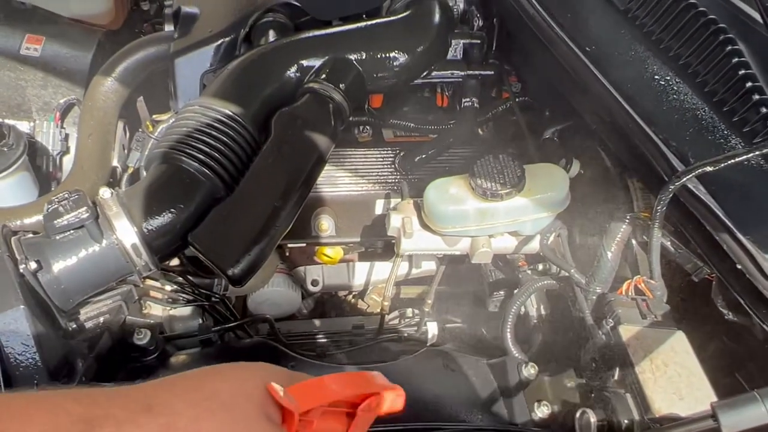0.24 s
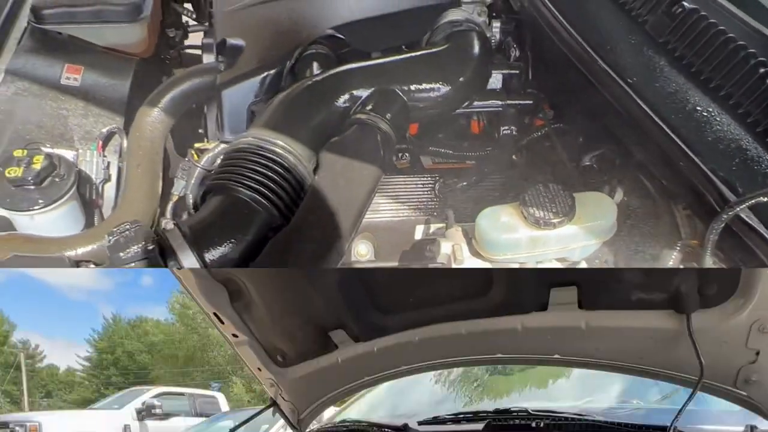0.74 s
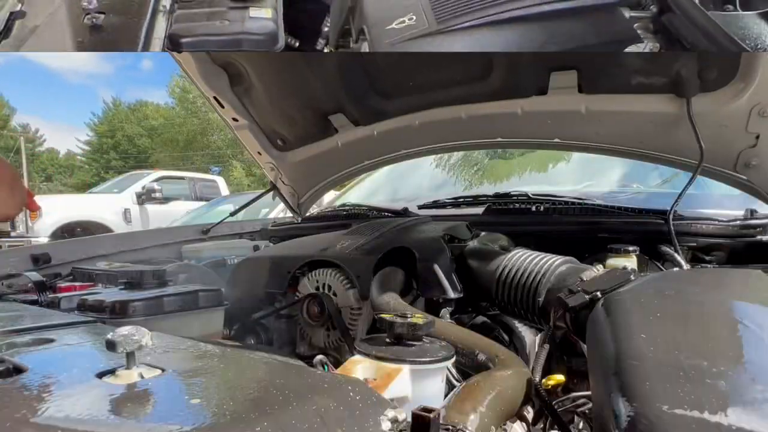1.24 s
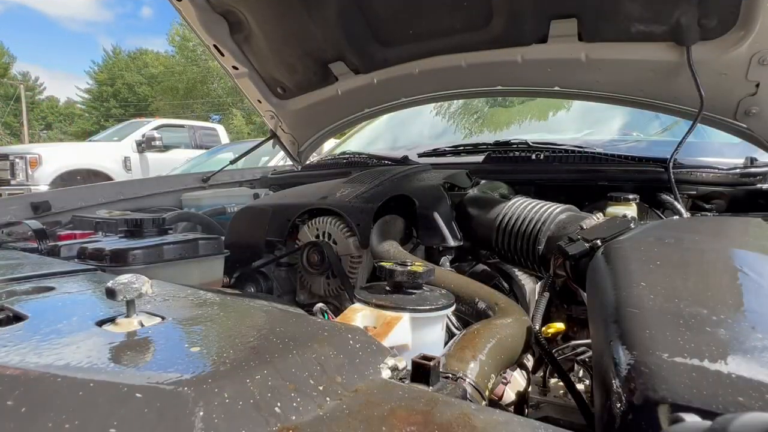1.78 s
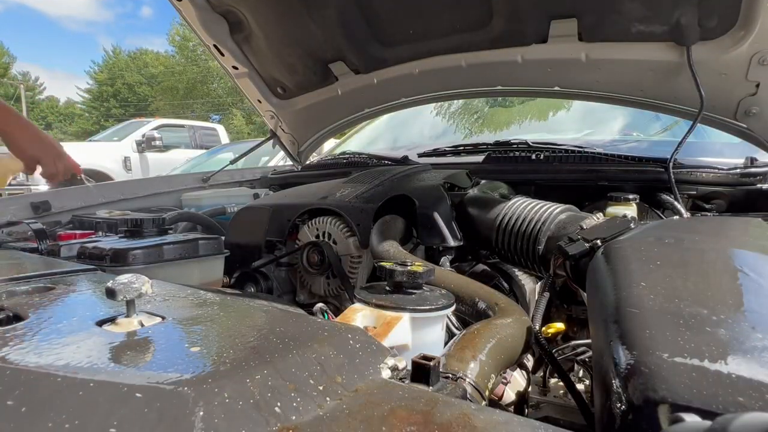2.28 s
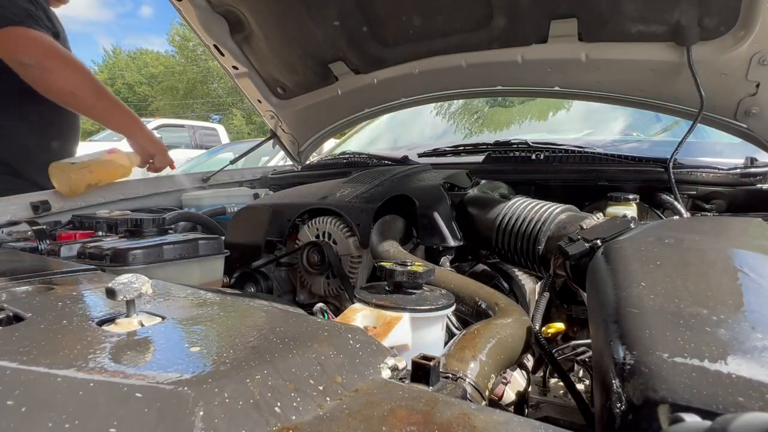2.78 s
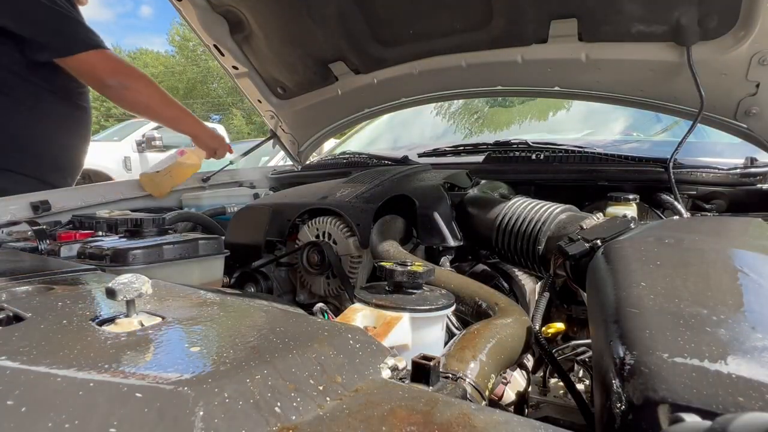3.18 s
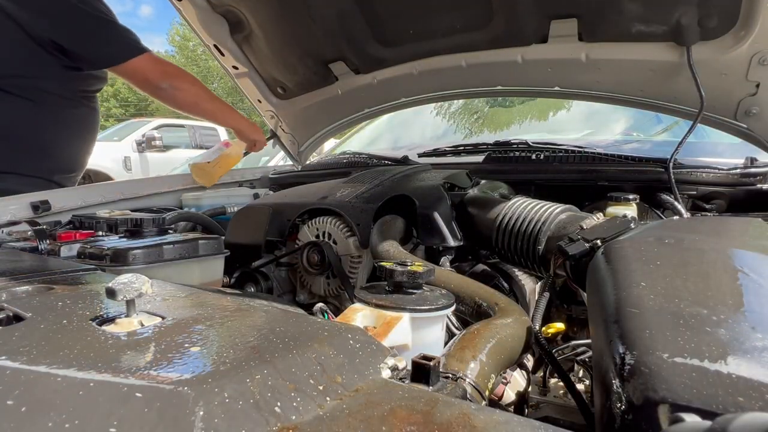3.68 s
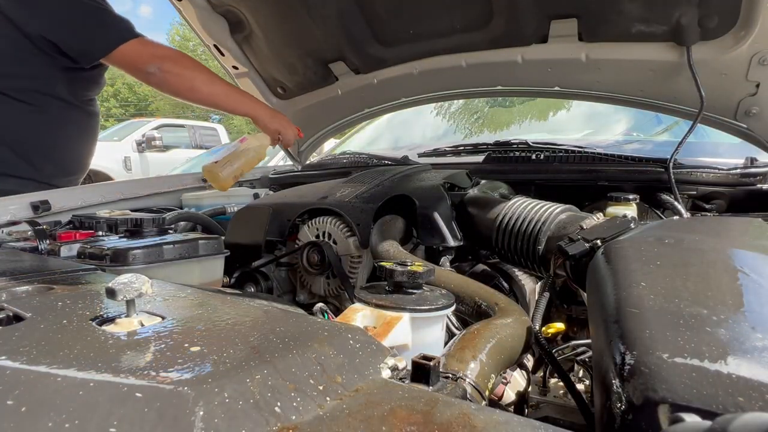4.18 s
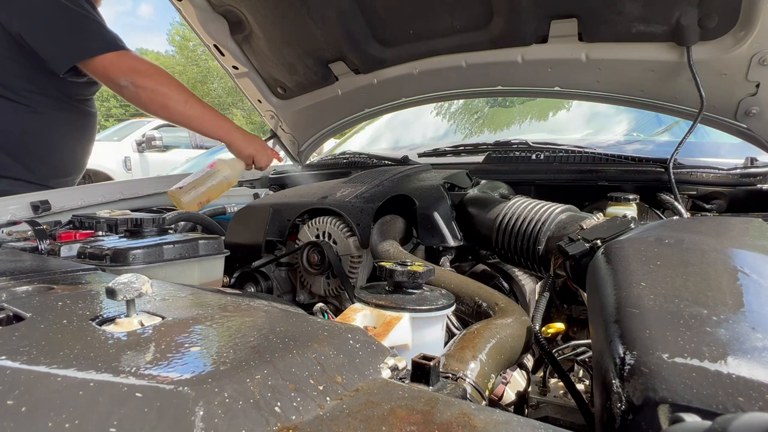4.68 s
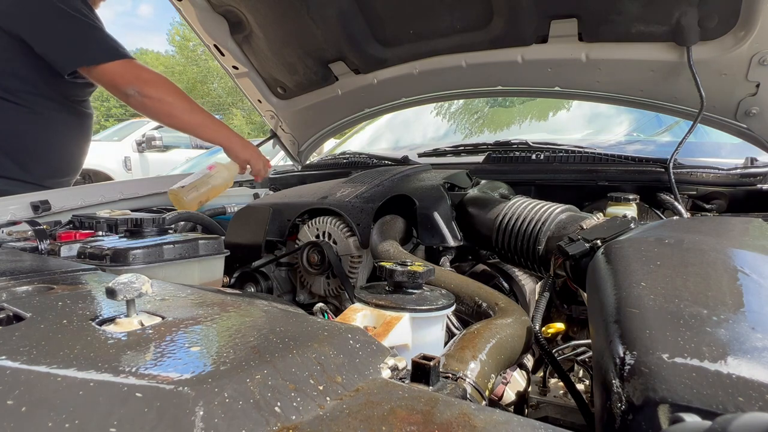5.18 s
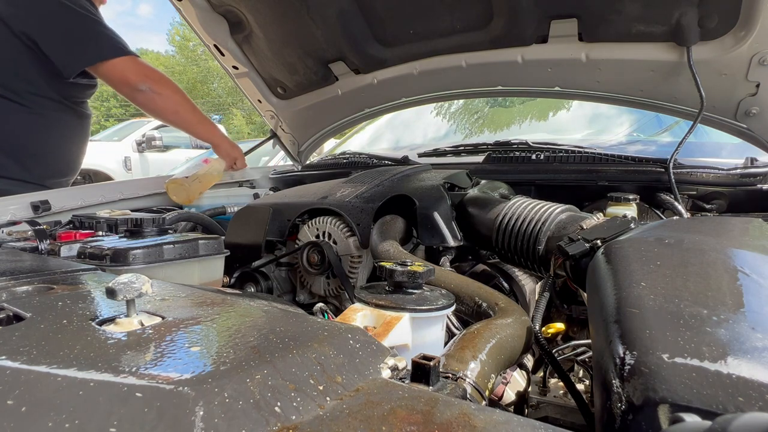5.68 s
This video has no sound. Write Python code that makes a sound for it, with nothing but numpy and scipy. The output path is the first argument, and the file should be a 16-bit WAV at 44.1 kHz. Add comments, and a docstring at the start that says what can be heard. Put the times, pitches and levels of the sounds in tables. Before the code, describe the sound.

From the very start, a hand spray bottle is pulled close to the microphone, with long squirts at about 0, 0.3 and 0.7 seconds and a weaker one at 1 second. Each has a sharp plastic snap, a hollow knock from the bottle and a hiss of mist, then a small rub and tick as the trigger springs back. From about 1 second until the end, near 6 seconds, the sprayer is farther off and quieter, pumping steadily seven or eight times a second with clicks and short, brighter hisses, slowing slightly. Soft hollow handling bumps come between about 1.8 and 3.5 seconds, and brief plastic creaks near 1, 2.1 and 5.2 seconds. Stray drops tick faintly on the engine covers. Soft outdoor air and a low hum lie underneath, boomier in the first second, and a faint distant whirr swells and fades between about 2 and 5 seconds.

```python
"""At a car's open engine bay, a hand sprayer gives a few long pulls close by, then a quick run farther off.
Each pull snaps the plastic trigger, knocks the hollow bottle and pushes a hiss of mist out of the nozzle;
a spring brings the trigger back with a rub and a tick. The bottle bumps and creaks in the hand and
stray drops tick on the engine covers. Behind it all are open air, a low hum and a faint whirr. Mono."""
import sys
import numpy as np
from scipy import signal
from scipy.fft import rfft, irfft, next_fast_len
from scipy.io import wavfile
from scipy.ndimage import uniform_filter1d

SR = 44100
rng = np.random.default_rng(int(sys.argv[2]) if len(sys.argv) > 2 else 0)


def wav_record(signal):
    """Record a signal, one row per channel, as 16-bit PCM in the file named by sys.argv[1]."""
    frames = np.transpose(np.atleast_2d(signal))
    bounded = np.clip(frames, -1, 1)
    # unit amplitude maps onto the largest positive 16-bit level
    quanta = np.round(bounded * 32767).astype(np.int16)
    wavfile.write(sys.argv[1], SR, quanta)


N = 261954
TIME = np.arange(N) / SR
NEAR_UNTIL_S, FAR_FROM_S = 0.655, 1.12  # the close sound fades into the farther one
TOP_HZ = 15900  # upper edge of the treble

# tone of the trigger's plastic when it is hit or rubbed: pitch_hz, level_db
PLASTIC_TONE = [(400, -61), (1200, -8.5), (2300, -9.5), (3100, -0.5), (4100, 1), (5500, 2), (6400, -5.5),
                (7400, 1), (8300, -3), (9700, -2.5), (12500, -4), (14600, -3), (16000, -5)]


def quick_pulls():
    """Short strokes in a steady rhythm; the hand's pace times the spray and the trigger's return."""
    # one row for each pull: start_s, snap_db, spray_db
    pulls = [(0.931, -45, -34), (1.0865, -22, -31.5), (1.213, -15.5, -30.5), (1.3327, -19, -27.5),
             (1.453, -20.5, -32.5), (1.5705, -23, -30.5), (1.6926, -22, -28), (1.82, -20.5, -29.5),
             (1.9475, -22.5, -29.5), (2.076, -22.5, -30), (2.203, -20, -32.5), (2.3223, -17.5, -28.5),
             (2.447, -23.5, -29), (2.5726, -19.5, -30), (2.698, -20, -29.5), (2.8246, -20, -29.5),
             (2.9475, -18, -30), (3.0744, -20.5, -29), (3.1993, -18.5, -28), (3.33, -21.5, -31.5),
             (3.4542, -20.5, -29), (3.587, -24.5, -29), (3.7259, -19, -31), (3.8589, -19.5, -29),
             (3.9945, -19.5, -29.5), (4.1325, -17.5, -28.8), (4.2728, -19.5, -29), (4.429, -23.5, -30),
             (4.5685, -21.5, -30), (4.7059, -17.5, -31), (4.8406, -19.5, -30.5), (4.9833, -19.5, -33),
             (5.1224, -21, -33), (5.2573, -23.5, -32.5), (5.391, -21, -33.5), (5.5262, -19.5, -33),
             (5.6663, -18.5, -33), (5.802, -21, -31.5)]
    # how the tone shifts as the bottle is turned: time_s, spray_tilt_db_per_octave, snap_ring_hz
    aim = [(1.2, 0.1, 4240), (1.92, -0.5, 4640), (2.1, 0.8, 11100), (2.7, -0.3, 9700), (3.4, 1.7, 9900),
           (3.9, 0.5, 12400), (4.4, 0, 11300), (5.8, 0.5, 14100)]
    # how loudly the bottle wall knocks along the run: time_s, level_db
    knock_levels = [(.93, -50), (1.1, -31.5), (1.85, -34.5), (2.08, -39.5), (2.85, -36), (3.5, -40.5),
                    (3.85, -39), (4.27, -32), (4.95, -38.5), (5.6, -35)]
    out, slack_s = np.zeros(N), .007
    usual_snap_db, usual_spray_db, longest_stroke_s = -16.5, -29, 0.0572
    gaps = np.diff(np.array(pulls)[:, 0])
    cycles = uniform_filter1d(np.append(gaps, gaps[-1]), size=3)
    aim_s, aim_tilt, aim_hz = np.transpose(aim)
    for (start_s, snap_db, spray_db), cycle_s in zip(pulls, cycles):
        # the finger lands first, harder before a harder snap
        finger_db = -51 + 2.2 * (snap_db - usual_snap_db) + 8 * rng.uniform(-1.1, 1)
        finger = burst(snap(-1, rattle=0.18, t60=0.011), finger_db)
        add(out, start_s - .016 * rng.uniform(.7, 1.3), finger)
        click = snap(2.1 + 0.34 * rng.standard_normal(), rattle=0.18, t60=0.018)
        ring_hz = min(np.interp(start_s, aim_s, aim_hz) * rng.uniform(0.89, 1.07), TOP_HZ)
        add(out, start_s - slack_s, squeeze(click, snap_db, ring_hz, slack_s, slack_db=-18.5))
        knock_db = np.interp(start_s, *np.transpose(knock_levels))
        add(out, start_s, knock(slow=0.99, grit=0.87) * undb(knock_db))
        # the deep thump grows as the bottle empties
        thump = bottle_note(329, delay_s=0.00901, swell_s=.003, scatter=0.046)
        thump += undb(-9) * bottle_note(452, delay_s=.002, swell_s=0.0025, scatter=0.097)
        add(out, start_s, burst(thump, min(-47 + 3 * start_s, -34.5)))
        # a harder squeeze gives a finer, brighter mist
        tilt_db = 1 + 0.5 * (spray_db - usual_spray_db) + np.interp(start_s, aim_s, aim_tilt)
        stroke_s = min(0.41 * cycle_s, longest_stroke_s)
        hiss = spray(stroke_s, tilt_db, bright_hz=rng.uniform(8700, 14600), start_db=-3.5,
                     close_s=0.0036, spatter_db=0.8, near=False)
        add(out, start_s + .001, hiss * undb(spray_db + 1.76))
        # the spring pushes the piston back
        rest_s = start_s + .66 * cycle_s
        slide = rub(rise_s=.024, tilt_db=-2) * undb(-57)
        add(out, rest_s - len(slide) / SR, slide)
        add(out, rest_s, rest_tick(tilt_db=-1.1, bounce_db=-5.5) * undb(-40 + 2 * rng.standard_normal()))
    return out


def long_pulls():
    """Full strokes close by: snap, knock, thump and spray, then the pump refills."""
    # one row for each pull: start_s, snap_db, snap_ring_hz, stroke_s, spray_db
    pulls = [(-0.048, -14, 4400, .12, -20.5), (0.3152, -12.5, 4440, .12, -20.5),
             (0.6674, -16, 3970, .1, -25.5), (1.0325, -22.5, 4350, .11, -33.5)]
    out, slack_s = np.zeros(N), .005
    refilled_s, rest_s = .183, .233  # counted from the snap
    for start_s, snap_db, ring_hz, stroke_s, spray_db in pulls:
        crack = resonance(snap(-4, rattle=0.47, t60=0.0073), hz=1650, width_hz=500, lift_db=7)
        click = burst(crack, 0) + burst(head_ring(), -1.5)
        add(out, start_s - slack_s, squeeze(click, snap_db, ring_hz, slack_s, slack_db=-14))
        thump = burst(bottle_note(510, delay_s=0.01106, swell_s=0.0017, scatter=0.055), -17.5)
        thump += burst(bottle_note(173, delay_s=0.0159, swell_s=0.0049, scatter=.03), -15)
        add(out, start_s, (knock(slow=2, grit=1) * undb(-17) + thump) * undb(snap_db))
        hiss = spray(stroke_s, tilt_db=-0.5, bright_hz=3780, start_db=-7,
                     close_s=0.0067, spatter_db=1.6, near=True)
        add(out, start_s + .001, hiss * undb(spray_db + 0.87))
        # the piston slides back and the trigger settles
        slide = resonance(rub(rise_s=.014, tilt_db=-2), hz=4370, width_hz=250, lift_db=10.5)
        add(out, start_s + refilled_s - len(slide) / SR, slide * undb(spray_db - 13.5))
        stop = rest_tick(tilt_db=-2, bounce_db=-10) + burst(head_ring(), -8)
        add(out, start_s + refilled_s, stop * undb(spray_db - 11.5))
        settle = rest_tick(tilt_db=-13, bounce_db=-6) + burst(head_ring(), -2.5)
        add(out, start_s + rest_s, settle * undb(spray_db - 21))
    return out


def spray(stroke_s, tilt_db, bright_hz, start_db, close_s, spatter_db, near):
    """The nozzle hisses: pressure rises, eases, then collapses as the piston reaches the end."""
    # tone of the mist close by: pitch_hz, level_db
    near_tone = [(300, -15.5), (1000, -17), (2350, -10), (2850, -3), (3700, -2), (5000, -3.5), (6800, -2.5),
                 (8500, -3.5), (11000, -8), (13500, -13.5), (16000, -13.5)]
    # tone of the mist from across the car: pitch_hz, level_db
    far_tone = [(400, -24), (1300, -13.5), (2300, -11.5), (3200, -7), (4600, -5.5), (6000, 1), (8300, -2),
                (9500, 0.5), (12500, -1), (15500, -1)]
    t = TIME[:10000]
    arch = np.sin(np.pi * np.minimum(t / stroke_s * 0.88, 1))
    opening = np.minimum(t / 0.0079, 1)
    closing = 1 / (1 + np.exp(np.minimum((t - stroke_s) / close_s, 50)))
    flow = undb(start_db * (1 - arch)) * opening * closing
    mist = noise(t) * undb(spatter_db * walk(3000, size=len(t)))
    mist = resonance(engine_echoes(mist, reach_s=.004), bright_hz, width_hz=0.17 * bright_hz, lift_db=3)
    return flow * unit(colour(mist, near_tone if near else far_tone, tilt_db))


def squeeze(click, snap_db, ring_hz, slack_s, slack_db):
    """The loose trigger rubs for slack_s, then snaps."""
    slack = rub(slack_s, tilt_db=-3.2)
    slack *= np.linspace(0, 1, len(slack)) * undb(slack_db + 2 * rng.standard_normal())
    ringing_click = burst(resonance(click, ring_hz, width_hz=480, lift_db=7.5), 0)
    return np.concatenate([slack, ringing_click]) * undb(snap_db)


def snap(tilt_db, rattle, t60):
    """A hit on plastic: one sharp edge and a noisy ring that dies quickly."""
    t = TIME[:2048]
    blow = rattle * noise(t) * fade(t, t60)
    blow[0] += 1
    return colour(engine_echoes(blow, reach_s=.0005), PLASTIC_TONE, tilt_db)


def head_ring():
    """The sprayer's head rings with a few strong notes, heard close by."""
    # the head's own notes: pitch_hz, level_db, fade_s
    notes = [(2280, -2.5, 0.013), (4350, -2, 0.0098), (4550, -4, 0.015), (5530, -7, 0.011),
             (6100, 7.5, 0.011), (6800, 1, 0.021), (8370, 4, .009)]
    t = TIME[:2048]
    ring = np.zeros(len(t))
    for hz, db, t60 in notes:
        gain = undb(db + 2 * rng.standard_normal())
        ring += gain * np.sin(2 * np.pi * hz * t * rng.uniform(0.97, 1.02)) * fade(t, t60)
    return ring


def knock(slow, grit):
    """The bottle wall flexes and crinkles after the snap; a slower squeeze spreads the knock out."""
    # the wall's notes, before slow stretches their times: pitch_hz, level_db, delay_s, swell_s
    notes = [(1980, -10, 0.00409, 0.0038), (1464, -5, .0052, 0.0029), (1171, 1, 0.00502, 0.0025),
             (972, -1, 0.005495, 0.0037), (525, -2, 0.00866, 0.0018)]
    wall = 0
    for hz, db, delay_s, swell_s in notes:
        gain = undb(db + 2 * rng.standard_normal())
        wall += gain * bottle_note(hz, slow * delay_s, slow * swell_s, scatter=0.043)
    t = TIME[:len(wall)]
    crinkle = noise(t) * undb(3.6 * walk(680, size=len(t)))
    crinkle *= (t > rng.uniform(.003, .007)) * fade(t, 0.025 * slow)
    crunch = colour(crinkle, [(300, -2), (2000, 9.5), (4000, 10.5), (9000, -11), (16000, -42)])
    return burst(wall, 0) + grit * burst(crunch, 0)


def bottle_note(hz, delay_s, swell_s, scatter):
    """One note of the bottle swells and dies fast; the grip shifts its pitch from pull to pull."""
    t = np.maximum(TIME[:4096] - delay_s - 0.00051 * rng.standard_normal(), 0)
    hz = hz * np.exp(scatter * rng.standard_normal())
    return np.sin(2 * np.pi * (hz * t + rng.random())) * t / swell_s * np.exp(-t / swell_s)


def rub(rise_s, tilt_db):
    """The piston slides with a grainy rub that swells up to its stop."""
    t = TIME[:max(int(rise_s * SR), 2)]
    grains = noise(t) * undb(4.5 * walk(900, size=len(t)))
    return unit(colour(grains, PLASTIC_TONE, tilt_db)) * np.sqrt(t / rise_s)


def rest_tick(tilt_db, bounce_db):
    """The trigger ticks against its stop and bounces once."""
    tick = burst(snap(tilt_db, rattle=0.15, t60=0.027), 0)
    bounce = burst(snap(tilt_db, rattle=0.29, t60=0.015), bounce_db + 2 * rng.standard_normal())
    lag = int(rng.uniform(.0026, 0.0057) * SR)
    return tick + np.pad(bounce, (lag, 0))[:len(tick)]


def bumps():
    """Handling gives the hollow plastic soft blows, each one low note in a dull rustle."""
    # one row for each bump: start_s, level_db, pitch_hz, fade_s
    blows = [(1.764, -37.5, 630, 0.023), (2.168, -28.5, 195, 0.053), (2.189, -35.5, 378, 0.036),
             (2.296, -32, 275, 0.069), (2.338, -35.5, 620, .04), (2.599, -37, 650, .045),
             (2.719, -37, 583, 0.084), (3.499, -27.5, 446, 0.028), (3.512, -30, 490, .035)]
    out, t = np.zeros(N), TIME[:6000]
    for start_s, db, hz, t60 in blows:
        rustle_tone = [(hz / 5, -35), (hz, 0), (1.24 * hz, -10), (1600, -18), (5000, -36)]
        rustle = unit(colour(noise(t), rustle_tone))
        push = 1 - np.exp(-t / 0.0052)
        blow = (np.sin(2 * np.pi * hz * t) + 0.5 * rustle) * push * fade(t, t60)
        add(out, start_s - .002, burst(colour(blow, [(hz / 4, -20), (hz / 1.5, 0)]), db))
    return out


def creaks():
    """The plastic slips briefly in the grip."""
    # one row for each creak: start_s, level_db, pitch_hz, fade_s
    slips = [(.875, -42, 2180, .08), (.994, -29.5, 4200, 0.13), (2.133, -35, 2170, .035),
             (5.178, -40.5, 2200, .05), (5.243, -39, 2200, .05)]
    out, t = np.zeros(N), TIME[:4096]
    for start_s, db, hz, t60 in slips:
        add(out, start_s, burst(band(noise(t) * fade(t, t60), hz, width_hz=0.83 * hz), db))
    return out


def droplets(count=50):
    """Stray drops tick on the wet engine covers."""
    out = np.zeros(N)
    for when, size, dullness in rng.random((count, 3)):
        start_s = NEAR_UNTIL_S + when * (N / SR - NEAR_UNTIL_S)
        add(out, start_s, burst(snap(-4 * dullness, rattle=.1, t60=.012), -52 + 9 * size))
    return out


def engine_echoes(x, reach_s, gain=0.18, count=5):
    """Sound bounces off nearby engine parts; the hand moves, so the echoes differ every time."""
    out = x.copy()
    for share, sign in zip(rng.uniform(.1, 1, count), rng.choice([-1, 1], count)):
        lag = max(int(share * reach_s * SR), 1)
        out[lag:] += gain * sign * x[:-lag]
    return out


def bay_echo(x, echo_db, t60):
    """Sound scatters under the open bonnet and leaves a short, faint tail."""
    t = TIME[:SR // 2]
    tail = noise(t) * fade(t, t60) * (t > .005)
    return x + undb(echo_db) * signal.fftconvolve(x, tail / np.sqrt(np.sum(tail ** 2)))[:N]


def air_and_hum():
    """Open air and a low hum, duller and boomier at first, down in the engine bay."""
    # tone of the air in the bay: pitch_hz, level_db
    near_tone = [(25, -25), (45, -13), (62, 7), (90, 5), (180, 1.5), (450, -3), (800, -4.5), (1400, -8),
                 (2600, -19), (4500, -12.5), (5800, -20), (7800, -11), (9500, -31), (15000, -34)]
    # tone of the air across the car: pitch_hz, level_db
    far_tone = [(40, -40), (70, -29), (105, 0.5), (200, 2), (450, -5.5), (900, -10), (1800, -12),
                (2500, -13), (2950, -15.5), (3300, -18), (5300, -20), (6800, -19.5), (10000, -21),
                (15000, -17.5)]
    # hum as of a distant motor; the two closest notes throb together: pitch_hz, level_db
    hum_notes = [(118.2, -54.5), (115, -65.5), (130, -71), (162.4, -71.5)]
    near_air = unit(colour(noise(TIME), near_tone)) * undb(-46.5 + walk(12.5))
    near_hum_hz = 210 + 3.7 * walk(19.9)
    near_hum_db = np.interp(TIME, [0, .35, .9], [-43, -46, -58]) + 2.1 * walk(16)
    near_hum = np.sin(2 * np.pi * np.cumsum(near_hum_hz) / SR) * undb(near_hum_db)
    breeze = undb(-48.5 + 1.3 * walk(9))
    far_air = unit(colour(noise(TIME), far_tone)) * breeze
    far_hum = sum(undb(db) * np.sin(2 * np.pi * (hz * TIME + rng.random())) for hz, db in hum_notes)
    far_hum *= np.sqrt(2) * undb(2.7 * walk(11) + np.linspace(-3, 1.2, N))  # wavers and slowly grows
    far_share = np.clip((TIME - NEAR_UNTIL_S) / (FAR_FROM_S - NEAR_UNTIL_S), 0, 1)
    return np.sqrt(1 - far_share) * (near_air + near_hum) + np.sqrt(far_share) * (far_air + far_hum)


def whirr():
    """A faint whirr far off: narrow bands of noise swell and fade."""
    # one row for each swell: middle_s, length_s, pitch_hz, width_hz, level_db
    swells = [(2.62, 0.85, 2000, 900, -53), (3.33, 0.41, 2900, 220, -57), (3.902, 0.41, 2950, 170, -53),
              (4.8, 0.86, 2910, 200, -61)]
    out = np.zeros(N)
    for middle_s, length_s, hz, width_hz, db in swells:
        swell = np.cos(np.pi * np.clip((TIME - middle_s) / length_s, -.5, .5))
        out += unit(band(noise(TIME), hz, width_hz)) * swell * undb(db)
    return out


def undb(db):
    """Turn decibels into a gain."""
    return 10 ** (np.asarray(db) / 20)


def unit(x):
    """Scale x to an average power of 1."""
    return x / np.sqrt(np.mean(x ** 2))


def burst(x, db):
    """Scale a short sound so that its energy equals db held for 3 ms."""
    return x * undb(db) * np.sqrt(.003 * SR / np.sum(x ** 2))


def add(out, start_s, x):
    """Mix x into out from start_s on."""
    start = int(round(start_s * SR))
    first, end = max(start, 0), min(start + len(x), N)
    if end > first:
        out[first:end] += x[first - start:end - start]


def fade(t, t60):
    """Die away by 60 dB every t60 seconds (fade_s in the tables)."""
    return np.exp(-np.log(1000) * t / t60)


def noise(t):
    """White noise as long as t."""
    return rng.standard_normal(len(t))


def walk(rate_hz, size=N):
    """A smooth random wander with a spread near 1."""
    hold = max(int(SR / rate_hz), 1)
    steps = np.repeat(rng.standard_normal(size // hold + 1), hold)
    return 1.2 * uniform_filter1d(steps, hold)[:size]


def colour(x, points, tilt_db=0):
    """Shape the tone through (pitch_hz, level_db) points; tilt the treble by tilt_db an octave."""
    size = 2 * next_fast_len(len(x))
    octave = np.log2(np.maximum(np.arange(size // 2 + 1) * SR / size, 1))
    hz, db = np.transpose(points)
    treble_db = tilt_db * np.maximum(octave - np.log2(2500), 0)
    gain = undb(np.interp(octave, np.log2(hz), db) + treble_db)
    # make the filter ring only after a hit, never before it
    cepstrum = irfft(np.log(gain))
    cepstrum[1:size // 2] *= 2
    cepstrum[size // 2 + 1:] = 0
    return irfft(rfft(x, size) * np.exp(rfft(cepstrum)))[:len(x)]


def resonance(x, hz, width_hz, lift_db):
    """Make the pitches around hz louder."""
    b, a = signal.iirpeak(hz, hz / width_hz, fs=SR)
    return x + (undb(lift_db) - 1) * signal.lfilter(b, a, x)


def band(x, hz, width_hz):
    """Keep only the pitches around hz."""
    b, a = signal.iirpeak(hz, hz / width_hz, fs=SR)
    return signal.lfilter(b, a, signal.lfilter(b, a, x))


def scene():
    """The sprayer over the background, the same in both ears; close by, it has less echo."""
    sprayer = long_pulls() + quick_pulls() + bumps() + creaks() + droplets()
    echo_db = np.interp(TIME, [NEAR_UNTIL_S, FAR_FROM_S], [-24, -19])
    mono = bay_echo(sprayer, echo_db, t60=0.31) + air_and_hum() + whirr()
    return np.array([mono, mono])


def record(dry):
    """Cut the deepest bass and the highest treble."""
    lean = signal.sosfilt(signal.butter(4, 42, "high", fs=SR, output="sos"), dry)
    return signal.sosfilt(signal.ellip(10, .2, 70, TOP_HZ, fs=SR, output="sos"), lean)


dry = scene()
out = record(dry)
wav_record(out)
```